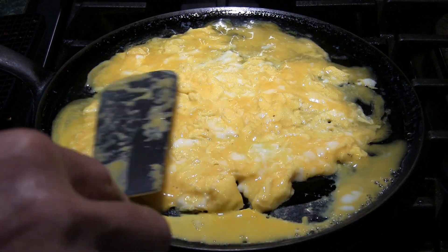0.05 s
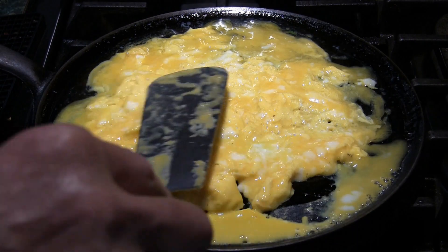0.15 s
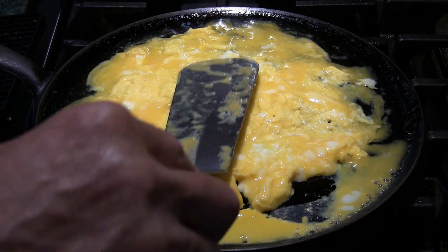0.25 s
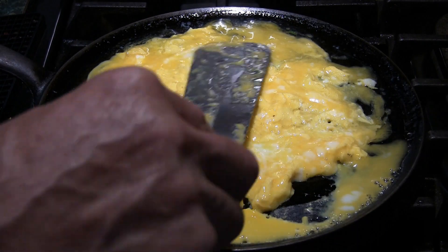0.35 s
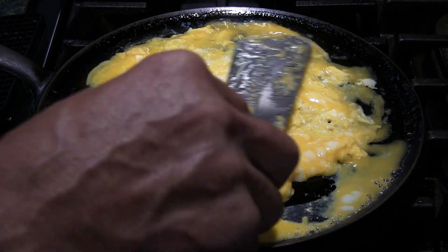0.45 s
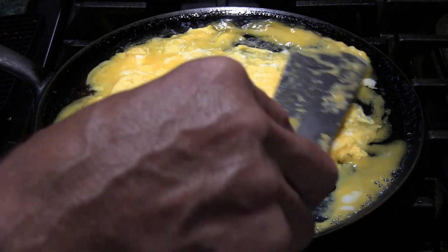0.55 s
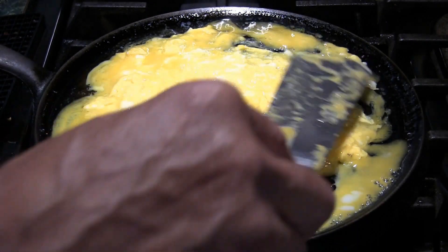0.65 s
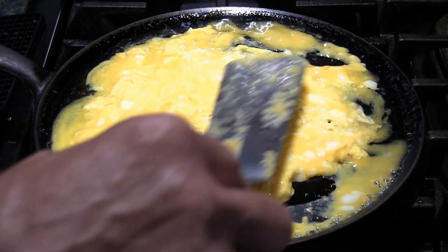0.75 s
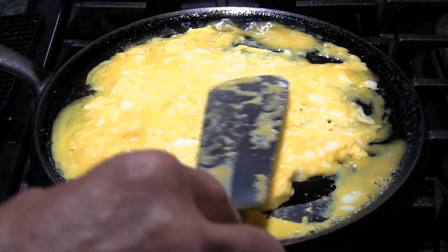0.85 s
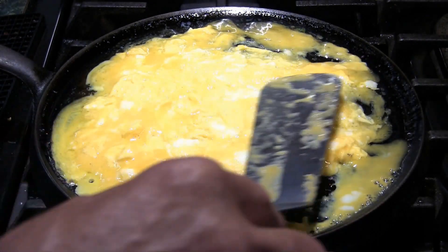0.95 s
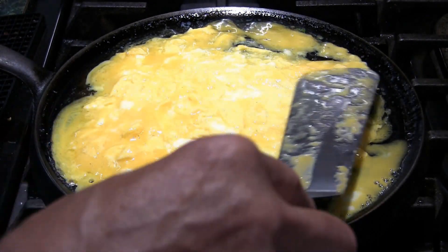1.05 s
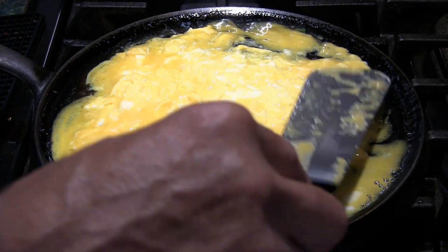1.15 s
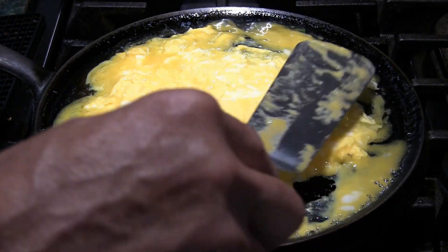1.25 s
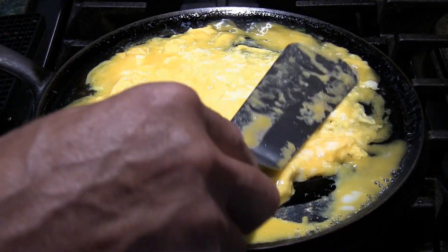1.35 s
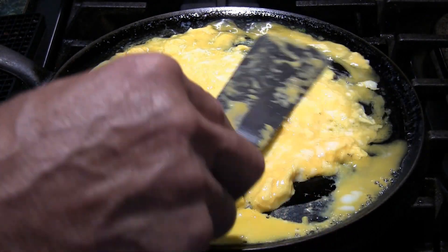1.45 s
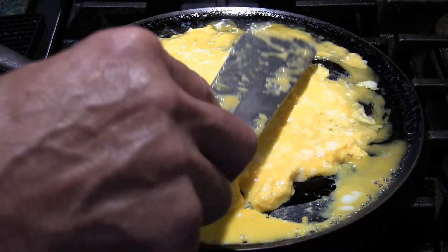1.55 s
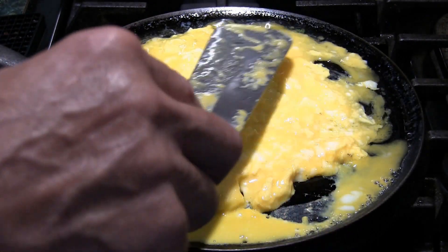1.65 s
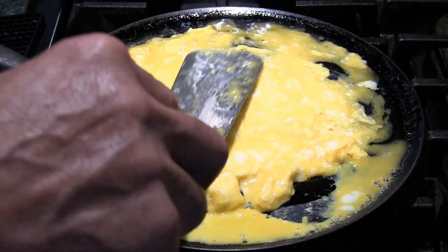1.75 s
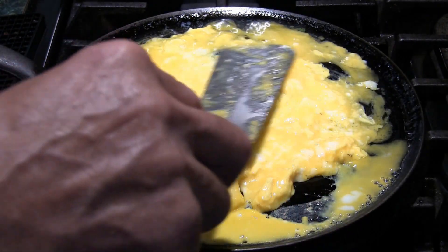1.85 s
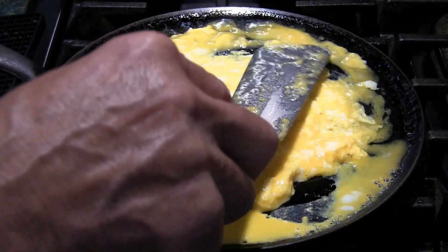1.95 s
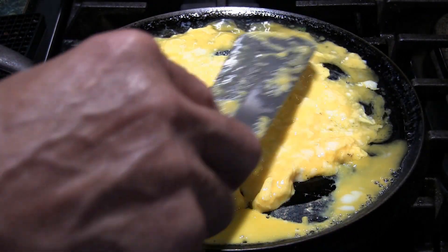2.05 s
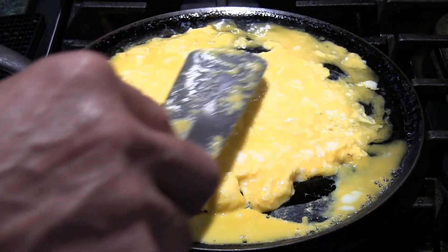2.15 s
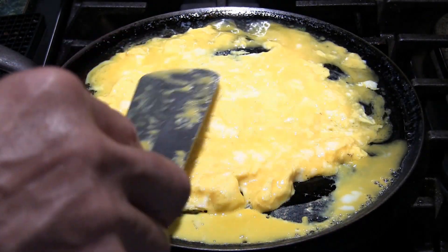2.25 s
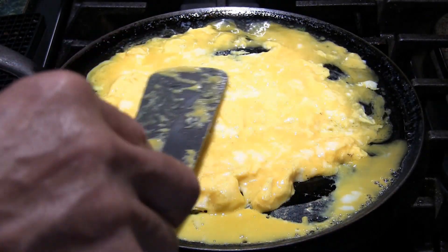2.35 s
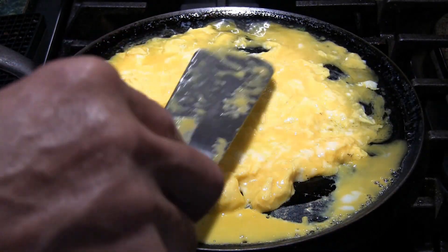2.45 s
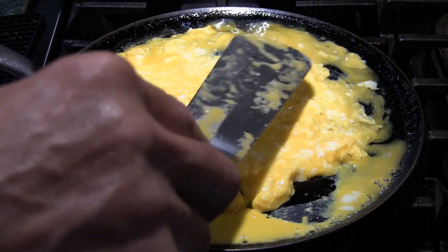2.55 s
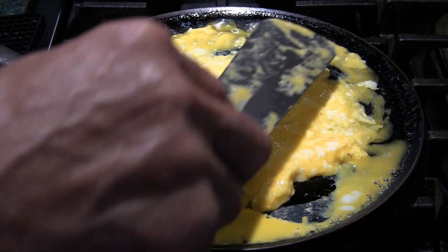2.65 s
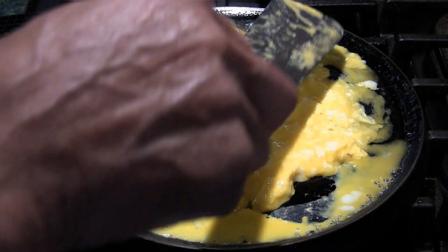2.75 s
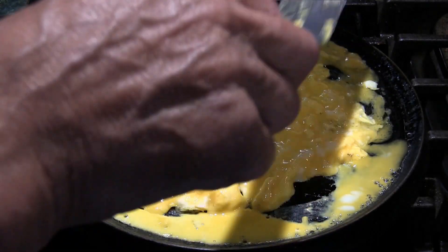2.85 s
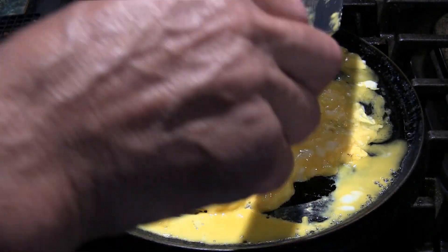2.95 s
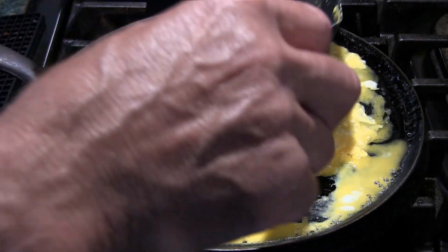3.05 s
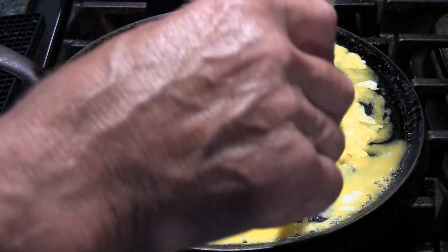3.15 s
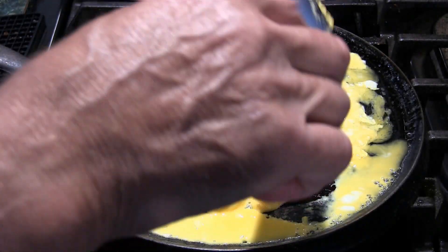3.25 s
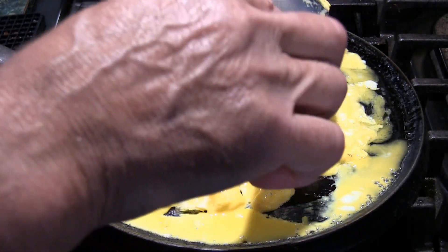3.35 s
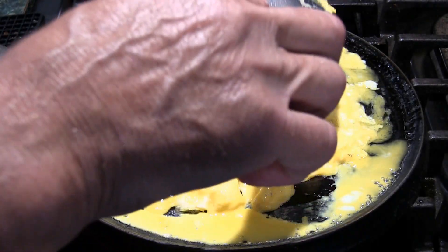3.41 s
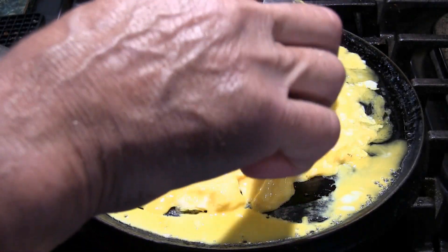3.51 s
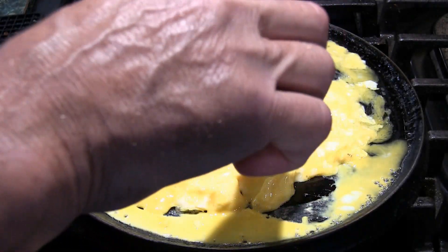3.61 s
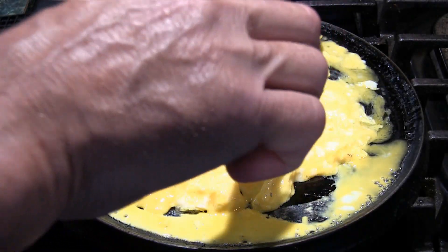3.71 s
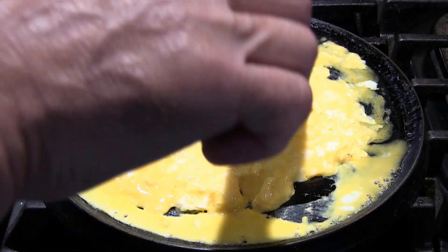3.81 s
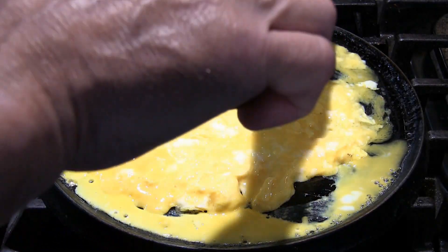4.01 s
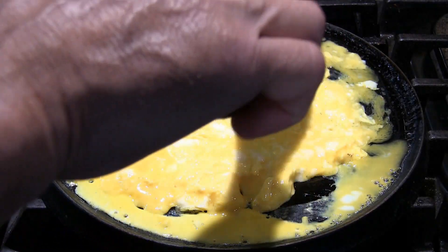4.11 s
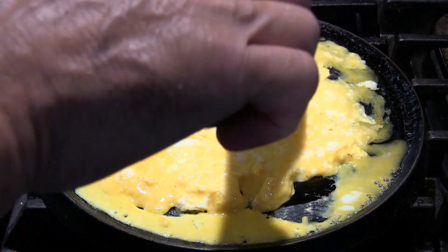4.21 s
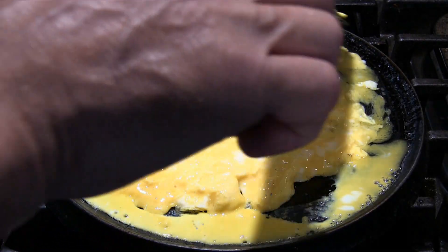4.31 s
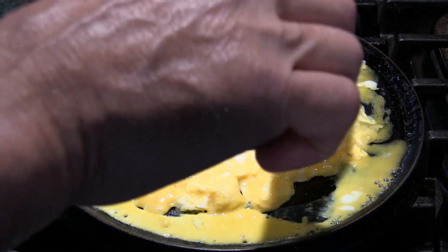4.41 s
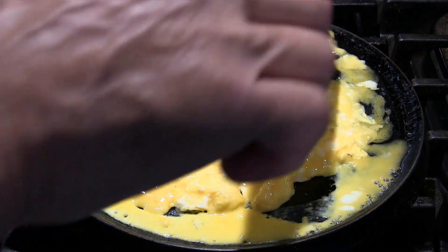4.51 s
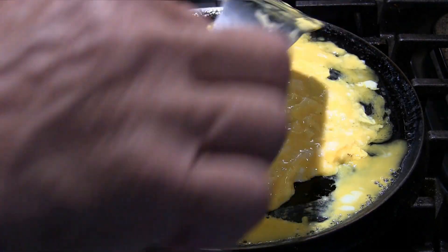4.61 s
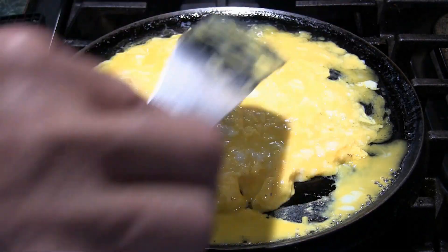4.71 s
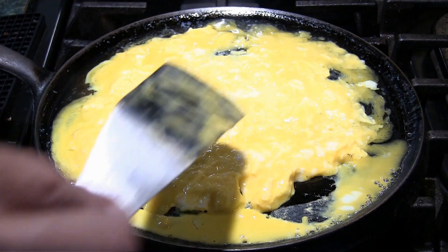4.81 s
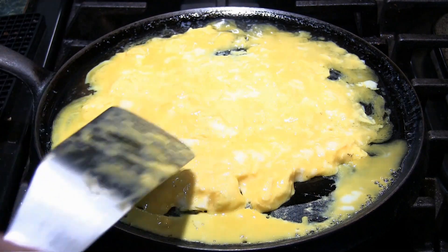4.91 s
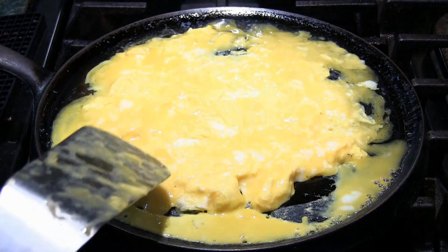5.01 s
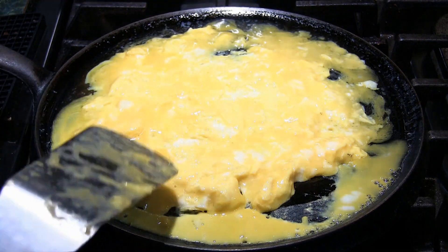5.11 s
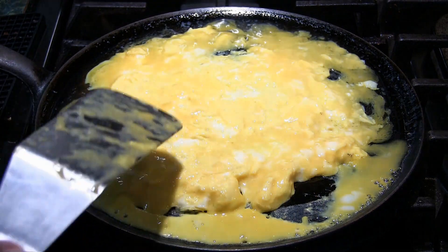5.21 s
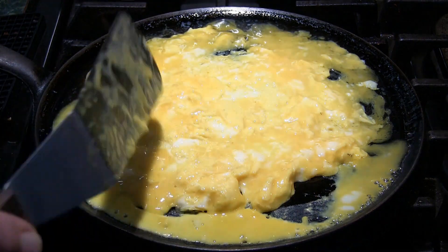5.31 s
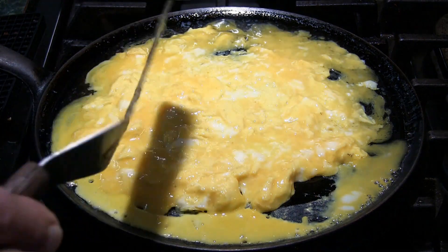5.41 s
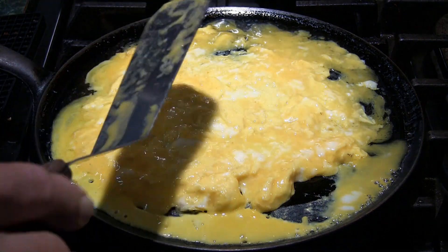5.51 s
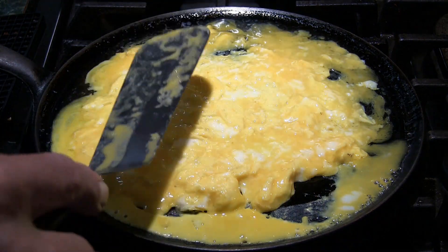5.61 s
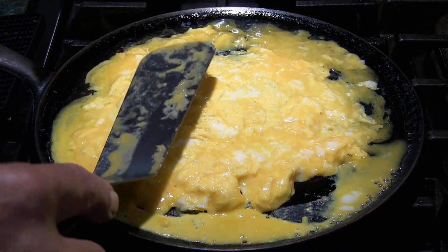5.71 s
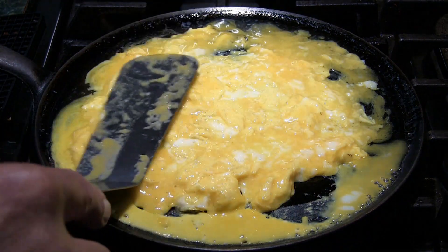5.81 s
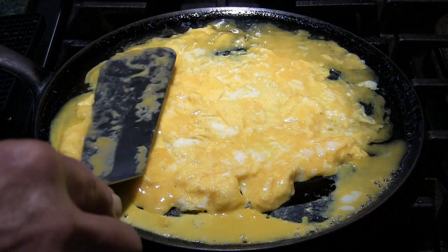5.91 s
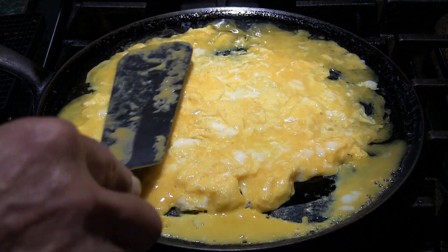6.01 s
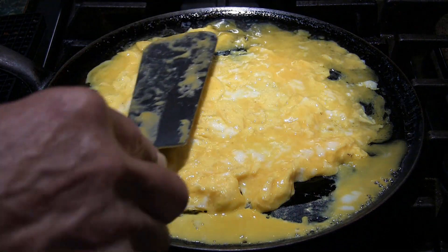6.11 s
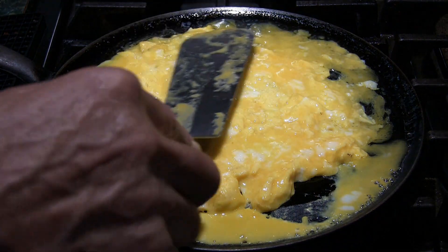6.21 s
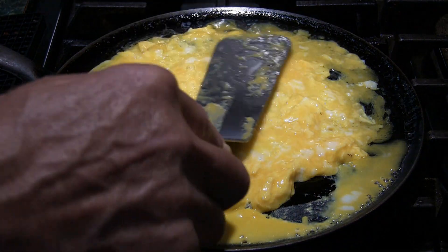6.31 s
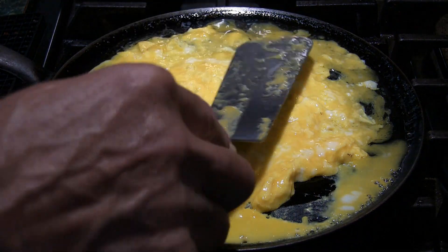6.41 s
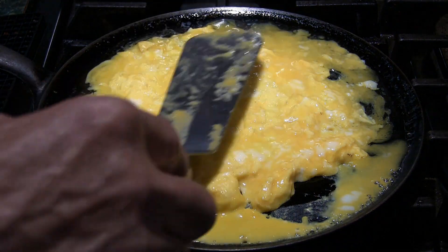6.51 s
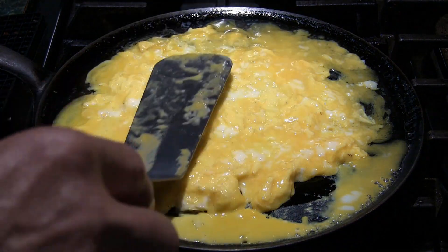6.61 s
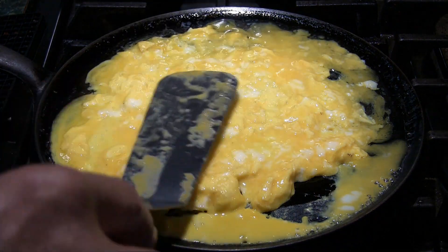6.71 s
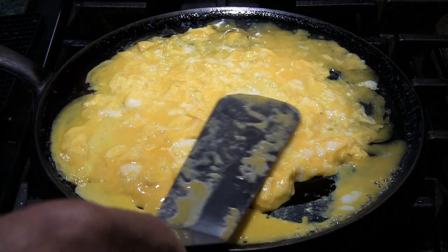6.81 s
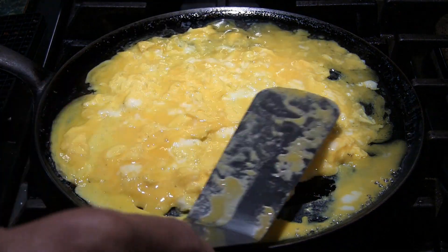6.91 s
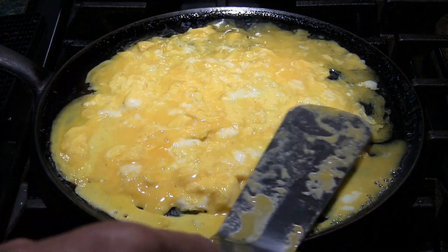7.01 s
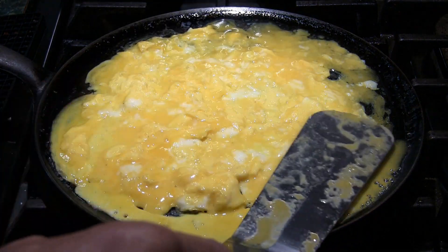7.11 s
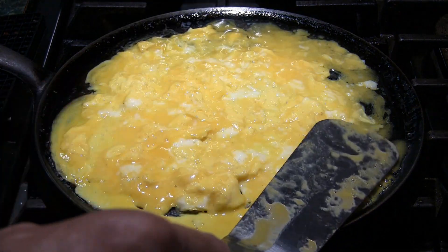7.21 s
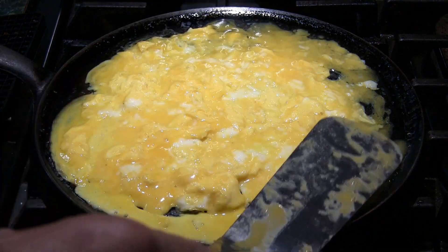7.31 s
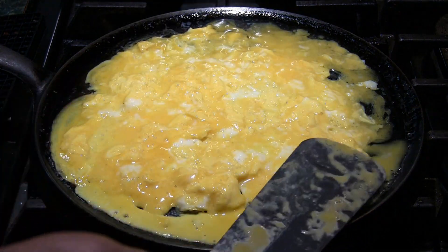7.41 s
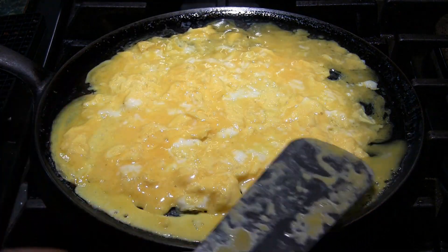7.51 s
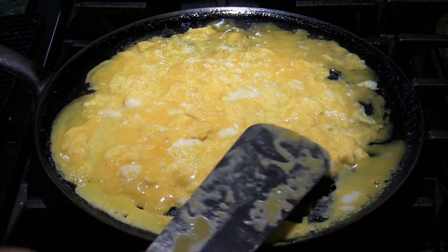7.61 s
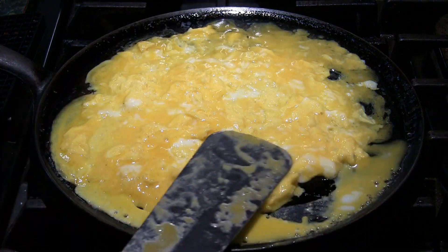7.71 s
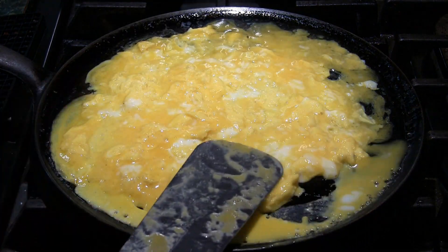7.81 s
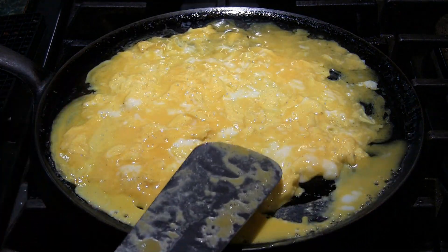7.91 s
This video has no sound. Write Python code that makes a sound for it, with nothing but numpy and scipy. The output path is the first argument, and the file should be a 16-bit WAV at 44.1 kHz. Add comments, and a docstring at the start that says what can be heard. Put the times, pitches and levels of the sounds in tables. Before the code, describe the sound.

Sharp metal clanks and short squeaky scrapes of a spatula on a skillet, with eggs softly sizzling and a kitchen fan humming.

```python
"""A small kitchen, the stereo microphone close to an iron skillet of eggs, which sits a little to the right.
A fan, a motor and the burner hiss and hum in the background; the egg crackles and its bubbles pop now and then.
Up front a steel spatula knocks the iron into ringing and scrapes over it, squeaking as it drags.
The walls give a short echo. The recorder turns its gain down after the hardest knocks."""
import sys
import numpy as np
from scipy import signal
from scipy.io import wavfile

SR = 44100
rng = np.random.default_rng(int(sys.argv[2]) if len(sys.argv) > 2 else 0)


def wrap_up_sound(samples):
    """Save the sound to the file named by the first command line argument, as 16-bit audio."""
    columns = np.atleast_2d(samples).T
    # keep every value between -1 and 1, then stretch to whole-number steps
    tamed = np.clip(columns, -1, 1)
    steps = np.round(tamed * 32767).astype(np.int16)
    wavfile.write(sys.argv[1], SR, steps)


N = 350595

# motor tones: (frequency [Hz]) and (level [dB])
MOTOR_TONES_HZ = [57.2, 63.3, 99.6, 111.7, 114.4, 119.8]
MOTOR_TONES_DB = [-51, -62.5, -59, -68, -55.5, -61]
# fan tones: (multiple of the blade rate) and (level [dB])
FAN_HARMONICS = [2, 3, 4, 5, 6, 7, 38, 39, 42, 61, 63]
FAN_TONES_DB = [-59, -56.5, -56.5, -59, -58.5, -67, -67, -64, -69.5, -64, -67]
# fan air and burner: (frequency [Hz], relative density [dB])
HISS_SPECTRUM = [(18, -40), (30, -21), (53, -8), (112, -7), (161, -9), (204, -1.5), (437, -3),
                 (1040, -12.5), (1460, -11), (2230, -19), (2680, -16.5), (3400, -19), (4300, -17),
                 (14400, -30.5), (16000, -34)]
# how alike the hiss is left and right: (frequency [Hz], correlation [0-1])
HISS_CORRELATION = [(60, 0.68), (150, 0.89), (380, 0.59), (950, 0.46), (2380, 0.51), (5980, 0.42),
                    (15000, 0.48)]
# airy whistles: (centre [Hz], width [Hz], level [dB])
AIR_WHISTLES = [(1475, 184, -61), (2673, 63, -68), (4233, 190, -64.5), (4840, 40, -67), (6460, 1100, -63.5)]
# kitchen echo: (frequency [Hz], t60 [s])
ROOM_DECAY = [(300, 0.46), (2000, 0.32), (8000, 0.39), (14000, 0.34)]
# frying crackle: (time [s], level [dB])
SIZZLE_LEVELS = [(0, -60), (.6, -60), (.9, -68), (1.1, -55), (1.3, -67), (5.7, -68), (6.3, -67), (7.0, -74),
                 (7.95, -65)]
# bubbles bursting in the egg: (time [s], peak [dB], pitch [Hz])
BUBBLE_POPS = [(0.173, -31, 5600), (.19, -34, 10500), (0.2462, -34, 8500), (.3494, -40, 12000),
               (.5186, -33, 11000), (0.913, -28.5, 5500), (0.993, -17, 11600), (1.105, -28, 7000),
               (1.161, -29, 6400), (2.5094, -37, 11000), (4.8853, -32, 6000), (5.942, -31.5, 4500),
               (6.1594, -37, 10500), (6.234, -35, 11500), (6.316, -35, 8700), (6.608, -31, 11000)]
# skillet and blade modes, before contact reshapes them: (frequency [Hz], gain [dB], base t60 [s])
METAL_MODES = [(636, -5, 0.63), (695, 1, 0.13), (907, -13, 0.17), (1168, 0, 0.57), (1180, -5, 0.084),
               (1302, 2, 0.19), (1463, -4.5, 0.39), (1710, -2.5, 0.45), (1996, 0, 0.26), (2440, -35, 0.25),
               (2776, 4.5, 0.25), (2960, 4.5, 0.18), (3400, 8.5, 0.045), (3600, -5.5, 0.093),
               (4010, 5, 0.078), (4150, 2, 0.15), (4530, 3, 0.1), (5280, -1, 0.051), (5570, 3, 0.056),
               (6450, -1, 0.15), (7270, -8, 0.3), (7500, -1, 0.055), (8050, -2, 0.15), (9330, -8, 0.17),
               (8970, -2, 0.031), (11900, -24, 0.033), (12500, -23, .08)]
# skillet ringing freely: (frequency [Hz], gain [dB], t60 [s])
SKILLET_MODES = [(606, -24.5, 0.34), (1076, -14, 0.3), (1519, -11, 0.2), (2382, -3.5, 0.092),
                 (3370, -6, 0.048), (9060, -21, .3)]
# grate under the skillet: (frequency [Hz], gain [dB], t60 [s])
GRATE_MODES = [(107, -6, 0.13), (151.5, 2, 0.33), (214.8, 7.5, 0.43), (340, -2, 0.5)]
# partials of the blade's squeak: (pitch [ratio], gain [dB])
SQUEAK_PARTIALS = [(1.0, -3.5), (1.46, -3.5), (1.95, -14)]
# blade dragged on iron: (start [s], rise [s], hold [s], fall [s], gain [dB], skillet bass [dB],
# grit [dB], squeak start [Hz], squeak end [Hz], squeak [dB], squeak overtones [dB])
SCRAPES = [(1.449, 0.058, .006, 0.069, -39.5, 2.5, -14, 2800, 2840, 16, -12),
           (1.796, 0.033, .006, 0.035, -49, 7, -10, 2200, 1810, 14, -8),
           (1.933, 0.015, 0.045, 0.041, -32, -12, -23, 2970, 3280, 7, 2),
           (3.722, 0.0024, 0.004, 0.077, -26.5, 3.5, -20, 2530, 2300, 15, -9),
           (3.735, 0.097, 0.046, .045, -17.5, -8.5, -4, 1910, 2280, 5.5, -8.5),
           (4.224, 0.018, 0.046, 0.034, -23, -8, -9, 2560, 2340, 11.5, -18),
           (4.503, 0.0023, 0.0036, 0.13, -14, -12, -3.5, 2820, 2620, -11, -3.5),
           (6.41, 0.03, 0.0035, .004, -37.5, -4, -2, 3220, 3220, 1, -2),
           (7.117, 0.0088, 0.0026, 0.014, -25.5, -11, -8, 3400, 3360, 11, -8),
           (7.17, .004, 0.072, 0.055, -47, 5, -4, 2570, 2610, -5, -4),
           (7.213, 0.032, 0.046, 0.017, -32.5, -8, -14, 2800, 2200, 18, -13)]
# spatula knocks and slips: (time [s], strike peak [dB], blade ring [Hz], second ring [Hz], bass [dB],
# treble [dB], ring length [factor], chatter [dB], free ring gain relative to the peak [dB])
KNOCKS = [(1.4275, -7.5, 1580, 3780, -25, 13.5, 0.37, -26, -41),
          (1.44, -10.5, 3100, 3810, 3.5, -9, 0.25, -12.5, -21.5),
          (1.5120, -24, 1070, 2970, -1, -26, 0.75, -17, -15),
          (1.8716, -19, 3860, 6100, -23, -9, 0.15, 7, -38),
          (1.8740, -14, 4350, 2700, -28, 32, 0.088, -5, -38), (1.9440, -26, 5800, 2940, -18, 7, 1, -3, -27),
          (2.0200, -24.5, 4320, 2500, -2, -4, 0.2, 7, -30),
          (2.3774, -27.5, 3740, 2640, -23, -25, 0.18, 7, -32),
          (3.7179, -2.5, 2360, 3410, 6, -12.5, 0.33, 2, -8),
          (3.8826, -6, 3460, 9270, 1, 13, 0.54, -12, -23),
          (4.2142, -1.5, 2330, 3250, -3, -41, 0.42, -18, -10.5),
          (4.286, -19, 2700, 3800, -12, 0, .4, 0, -30), (4.5027, 7.5, 3430, 8500, -27, 3, 0.29, -12, -16),
          (6.445, -36, 5840, 3200, -15, 2, .2, -10, -35), (7.1190, -26, 3020, 4500, -17, -6, .3, -21, -30),
          (7.126, -22, 3450, 4800, -5, 9, 0.16, -5, -33),
          (7.1545, -4.5, 3000, 4640, 0.5, -15, 0.33, -15.5, -22),
          (7.2700, -33, 2740, 2200, -20, -14, 0.56, -2, -32),
          (7.2850, -29, 2220, 3930, -20, -18, 0.46, -10, -30),
          (7.4750, -22, 2900, 3620, -16, -17.5, 0.34, -10, -30),
          (7.4837, -5.5, 2390, 5130, 1, -1, 0.22, -4, -17.5),
          (7.8042, -26, 2640, 3620, -18, -21, 0.19, -28, -23)]

FAN_BLADE_HZ, HISS_DB = 69.87, -42.5
ROOM_DB, LEFT_VS_RIGHT_DB = -7.5, -2
WET_PEAK_S, WET_HZ, WET_DB = 6.4495, 6170, -23
WET_GLIDE_HZ_S, WET_RISE_DB_S, WET_FALL_DB_S = 182000, 2500, 4000
SCRAPE_EDGE_DB, THUD_DB = -29.5, -17   # a scrape's ends against its hold; thud within the free ring
CEILING_DB, RECOVERY_DB_S, ATTACK_S = -1.5, 2, 0.00018
LOW_CUT_HZ, HIGH_CUT_HZ = 61.7, 15800


def from_db(db):
    return 10 ** (np.asarray(db) / 20)


def unit_rms(x):
    return x / np.sqrt(np.mean(x ** 2) + 1e-20)


def unit_peak(x):
    return x / np.max(np.abs(x))


def at_hz(points, hz):
    return np.interp(np.log(hz), np.log(np.array(points)[:, 0]), np.array(points)[:, 1])


def band(x, low_hz, high_hz):
    sos = signal.butter(2, [low_hz, min(high_hz, .45 * SR)], "band", fs=SR, output="sos")
    return signal.sosfilt(sos, x)


def high_pass(x, hz):
    return signal.sosfilt(signal.butter(4, hz, "high", fs=SR, output="sos"), x)


def add(out, at_s, sound):
    i = round(at_s * SR)
    out[i:i + len(sound)] += sound[:N - i]


def drift(rate_hz, size=N):
    """A smooth random wander with a spread of 1."""
    r = np.exp(-80 * np.pi * rate_hz / SR)
    slow = signal.lfilter([1], [1, -2 * r, r * r], rng.standard_normal(size // 40 + 2002))[2000:]
    return np.interp(np.arange(size) / 40, np.arange(len(slow)), slow / np.std(slow))


def ring(x, hz, t60):
    """One mode: a unit click sets off a decaying sine of height 1."""
    r, w = from_db(-60 / (t60 * SR)), 2 * np.pi * hz / SR
    return signal.lfilter([0, np.sin(w)], [1, -2 * r * np.cos(w), r * r], x + 1e-18)


def gliding_ring(x, hz, width_hz):
    """A resonance with a moving centre: shift down by its phase, smooth, shift back."""
    turn, r = np.exp(2j * np.pi * np.cumsum(hz) / SR), np.exp(-np.pi * width_hz / SR)
    return unit_rms((signal.lfilter([1], [1, -2 * r, r * r], x / turn) * turn).real)


def motor_and_fan_hum():
    """Steady motor tones left of the microphone, and fan blade harmonics that waver in level."""
    t = np.arange(N) / SR
    motor = sum(from_db(db) * np.sin(2 * np.pi * (hz * t + rng.random()))
                for hz, db in zip(MOTOR_TONES_HZ, MOTOR_TONES_DB))
    fan = sum(from_db(db + 2 * drift(4.7)) * np.sin(2 * np.pi * (k * FAN_BLADE_HZ * t + rng.random()))
              for k, db in zip(FAN_HARMONICS, FAN_TONES_DB))
    return np.sqrt(2) * (motor * from_db([[1.2], [-1.2]]) + fan)


def air_and_burner_hiss():
    """Fan air and burner: a wide bed of flickering third-octave noise bands, with faint whistles."""
    out, edges = 0, 35 * 2 ** (np.arange(28) / 3)
    white = rng.standard_normal((2, 2, N))
    for k, (low, high) in enumerate(zip(edges, edges[1:])):
        mid, side = band(white[k % 2], low, high)
        hz = np.sqrt(low * high)
        alike = at_hz(HISS_CORRELATION, hz)
        gain = from_db(at_hz(HISS_SPECTRUM, hz) + 1.24 * drift(10.2))
        out = out + gain * (np.sqrt(1 + alike) * mid + np.sqrt(1 - alike) * side * [[1], [-1]])
    out = from_db(HISS_DB) * unit_rms(out)
    for hz, width_hz, db in AIR_WHISTLES:
        out += from_db(db) * unit_rms(band(white[0, 0, ::-1], hz - width_hz / 2, hz + width_hz / 2))
    return out


def kitchen_echo(x):
    """The room's echoes: noise dying band by band, partly shared by both channels."""
    t, edges = np.arange(SR // 2) / SR, np.geomspace(200, 19000, 9)
    white = rng.standard_normal((2, len(t))) + 1.3 * rng.standard_normal(len(t))
    # alternate signs keep the bands from cancelling where they meet
    tail = sum((-1) ** k * band(white, low, high) * from_db(-60 * t / at_hz(ROOM_DECAY, np.sqrt(low * high)))
               for k, (low, high) in enumerate(zip(edges, edges[1:])))
    tail *= np.minimum(1, t / 0.0021)
    return signal.fftconvolve(x[None], tail / np.sqrt(np.sum(tail ** 2) / 2), axes=1)[:, :N]


def near_reflections(x):
    """Nearby surfaces scatter the treble differently to each side of the microphone."""
    t = np.arange(SR // 50) / SR
    scatter = high_pass(rng.standard_normal(len(t)) * (t > .001) * np.exp(-t / 0.0021), 3700)
    side = from_db(-9.5) * signal.fftconvolve(x, scatter / np.sqrt(np.sum(scatter ** 2)))[:N]
    return side * [[1], [-1]]


def sizzle():
    """Frying egg: many tiny, bright, uneven clicks, partly different on each side."""
    times, db = np.transpose(SIZZLE_LEVELS)
    sizes = from_db(4.0 * np.minimum(rng.exponential(1, (3, N)), 4)) * rng.choice([-1, 1], (3, N))
    clicks = sizes * (rng.random((3, N)) < 1500 / SR)
    crackle = unit_rms(band(clicks[0] + 0.75 * clicks[1:], 4200, 13500))
    return from_db(np.interp(np.arange(N) / SR, times, db)) * crackle


def bubble_pops():
    """Bubbles burst in the egg, each a bright snap that rings for a few cycles."""
    out, t = np.zeros(N), np.arange(SR // 20) / SR
    for at_s, peak_db, hz in BUBBLE_POPS:
        burst = rng.standard_normal(len(t)) * np.exp(-t / 0.00076)
        pop = band(burst, .5 * hz, 1.8 * hz) + 1.1 * ring(burst, hz, t60=6.3 / hz)
        add(out, at_s, from_db(peak_db) * unit_peak(pop))
    return out


def wet_squeak():
    """Wet egg under the blade gives one rising squeak with its octave."""
    out, t = np.zeros(N), np.arange(-SR // 100, SR // 100) / SR
    phase = 2 * np.pi * np.cumsum(WET_HZ + WET_GLIDE_HZ_S * np.minimum(t, 0)) / SR
    level = from_db(WET_DB + np.minimum(WET_RISE_DB_S * t, -WET_FALL_DB_S * t))
    add(out, WET_PEAK_S + t[0], np.sqrt(2) * level * (np.sin(phase) + 0.16 * np.sin(2 * phase)))
    return out


def spatula_scrapes():
    """Rough iron kicks the blade with dense clicks; the contact damps the modes, the blade squeaks."""
    out = np.zeros(N)
    for at_s, rise, hold, fall, gain_db, bass_db, grit_db, hz0, hz1, squeak_db, overtone_db in SCRAPES:
        t = np.arange(0, rise + hold + fall, 1 / SR)
        n = len(t)
        kicks = rng.standard_normal(n) * (rng.random(n) < 6000 / SR) * from_db(1.56 * drift(150, n))
        modes = []
        for hz, db, t60 in METAL_MODES:
            drive = kicks * from_db(.5 * db + 2.3 * drift(23, n))
            modes.append((hz, ring(drive, hz, min(0.24 * t60, .03))))
        bass, mid, treble = [unit_rms(sum(mode for hz, mode in modes if low < hz <= high))
                             for low, high in ((0, 1400), (1400, 6000), (6000, SR))]
        squeak_hz = np.linspace(hz0, hz1, n)
        squeak = sum(from_db(db + overtone_db * (k > 1)) * gliding_ring(kicks, k * squeak_hz, 660)
                     for k, db in SQUEAK_PARTIALS)
        rasp = unit_rms(band(band(kicks, 670, 6200), 630, 6500))
        body = unit_rms(mid + from_db(7.5) * rasp + from_db(squeak_db) * squeak)
        grit = unit_rms(unit_rms(band(kicks, 5400, 11600)) + from_db(2.0) * treble)
        scrape = high_pass(body + from_db(bass_db) * bass + from_db(grit_db) * grit, 535)
        press_db = SCRAPE_EDGE_DB * np.maximum(0, np.maximum(1 - t / rise, (t - rise - hold) / fall))
        fade = np.minimum(1, np.minimum(t, t[-1] - t) / 0.0013)
        add(out, at_s, fade * from_db(gain_db + press_db) * scrape)
    return out


def grate_thud(t):
    """A knock's brief push sets the grate's low modes ringing."""
    push = np.sin(np.pi * np.minimum(t / 0.0053, 1))
    return unit_peak(sum(from_db(db) * ring(push, hz, t60) for hz, db, t60 in GRATE_MODES))


def skillet_ring(t, tilt):
    """Close pairs of skillet modes keep ringing, and beating, once the knock has died."""
    click = signal.unit_impulse(len(t))
    return sum(from_db(db + 0.23 * at_hz(tilt, hz))
               * (ring(click, hz, t60) + 0.39 * ring(click, 1.012 * hz, 1.14 * t60))
               for hz, db, t60 in SKILLET_MODES)


def spatula_knocks():
    """Steel hits iron: a crack and a moment of chatter drive the metal's modes and the blade's rings."""
    out, t = np.zeros(N), np.arange(SR // 2) / SR
    # egg and grip load the metal differently each time: strengths and pitches shift a little
    loads = rng.standard_normal((len(KNOCKS), len(METAL_MODES), 2))
    thud = from_db(THUD_DB) * grate_thud(t)
    for knock, load in zip(KNOCKS, loads):
        at_s, peak_db, blade_hz, second_hz, bass_db, treble_db, length, chatter_db, free_db = knock
        chatter = rng.standard_normal(len(t)) * np.exp(-t / (0.017 * length))
        blow = np.exp(-t / .00005) * (t < .001) + from_db(chatter_db) * chatter
        tilt = [(1200, bass_db), (1800, 0), (4200, 0), (7000, treble_db)]
        metal = sum(from_db(db + at_hz(tilt, hz) + 2 * boost)
                    * ring(blow, hz * (1 + 0.035 * bend), min(0.54 * t60 * length, 100 / hz))
                    for (hz, db, t60), (boost, bend) in zip(METAL_MODES, load))
        blade = from_db(16) * ring(blow, blade_hz, t60=0.038 * length)
        blade += from_db(7) * ring(blow, second_hz, t60=0.09 * length)
        crack = band(band(blow, 1130, 6700), 880, 8600) + from_db(treble_db) * band(blow, 2530, 10000)
        strike = unit_peak(high_pass(metal + blade + from_db(27) * crack, 638))
        free_ring = skillet_ring(t, tilt) + thud
        add(out, at_s, from_db(peak_db) * (strike + from_db(free_db) * free_ring))
    return out


def scene():
    """At the microphone: the skillet close and slightly right, over sizzle, hiss and hum."""
    skillet = spatula_knocks() + spatula_scrapes() + bubble_pops() + wet_squeak()
    in_room = skillet + near_reflections(skillet) + from_db(ROOM_DB) * kitchen_echo(skillet)
    pan = from_db([[LEFT_VS_RIGHT_DB / 2], [-LEFT_VS_RIGHT_DB / 2]])
    return in_room * pan + sizzle() + air_and_burner_hiss() + motor_and_fan_hum()


def record(dry):
    """Peaks over the ceiling duck the gain, which climbs back slowly; then soft clip, low and high cut."""
    climb_db = RECOVERY_DB_S * np.arange(N) / SR
    over_db = np.maximum(20 * np.log10(np.abs(dry.mean(0)) + 1e-9) - CEILING_DB, 0)
    cut_db = np.maximum.accumulate(over_db + climb_db) - climb_db
    r = np.exp(-1 / (ATTACK_S * SR))
    ducked = dry * from_db(-signal.lfilter([1 - r], [1, -r], cut_db))
    clipped = 0.91 * np.tanh(ducked / 0.87)
    high_cut = signal.ellip(12, .5, 70, HIGH_CUT_HZ, fs=SR, output="sos")
    return signal.sosfilt(high_cut, high_pass(clipped, LOW_CUT_HZ))


dry = scene()
out = record(dry)
wrap_up_sound(out)
```